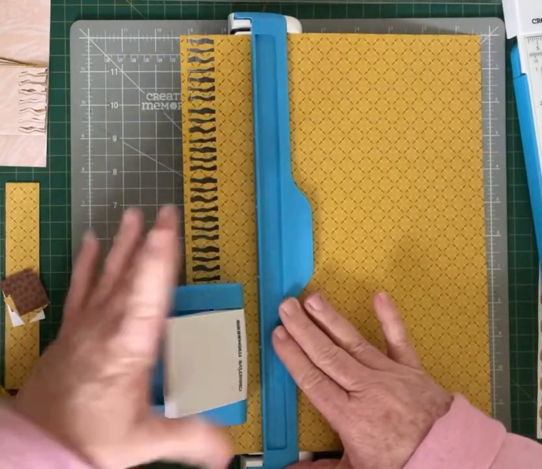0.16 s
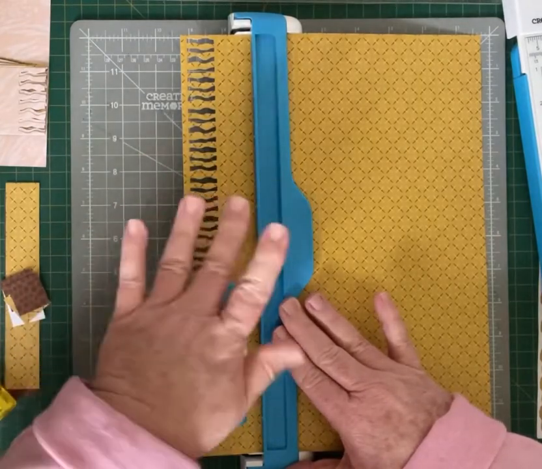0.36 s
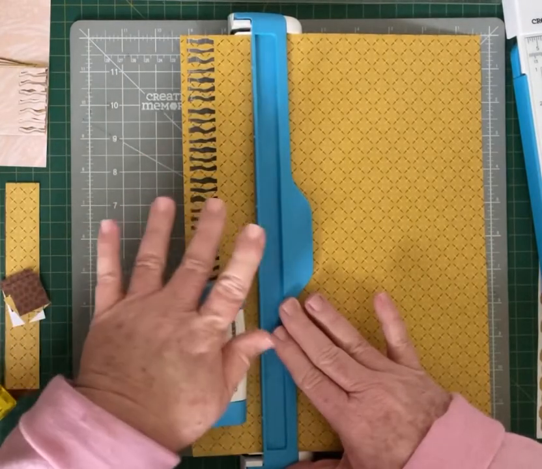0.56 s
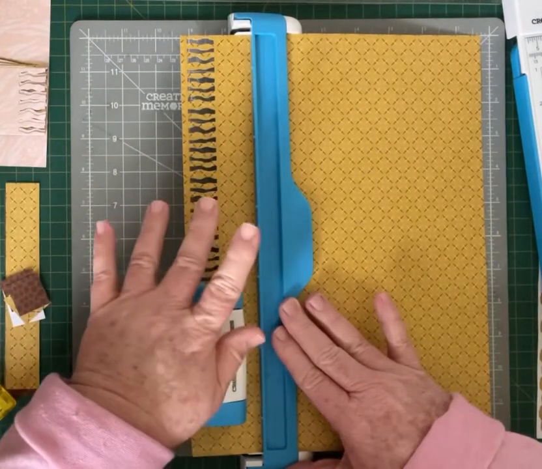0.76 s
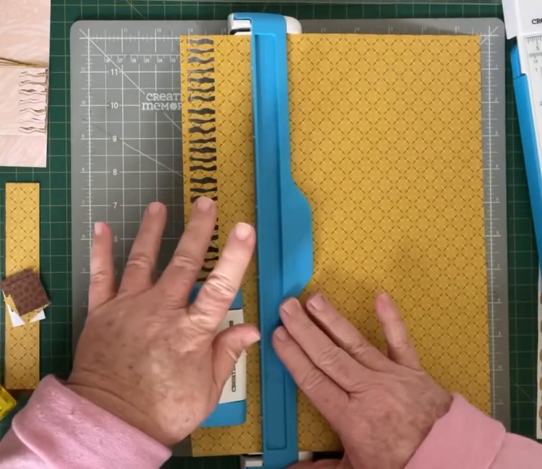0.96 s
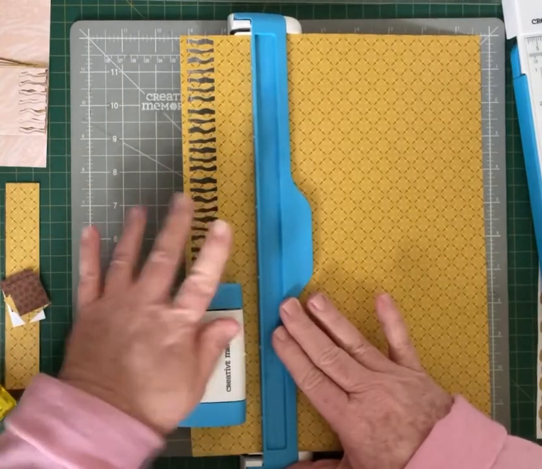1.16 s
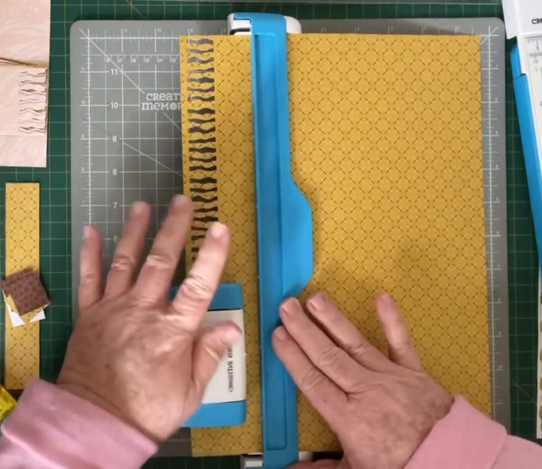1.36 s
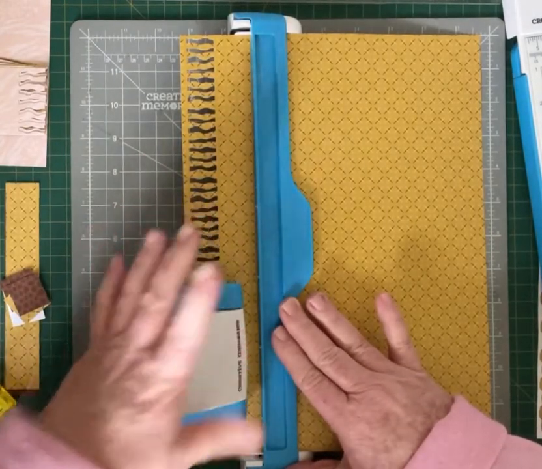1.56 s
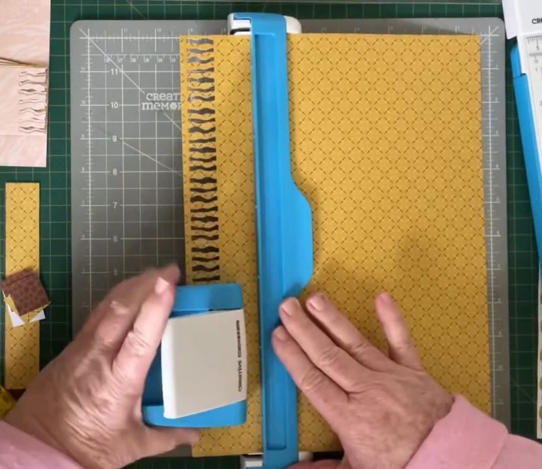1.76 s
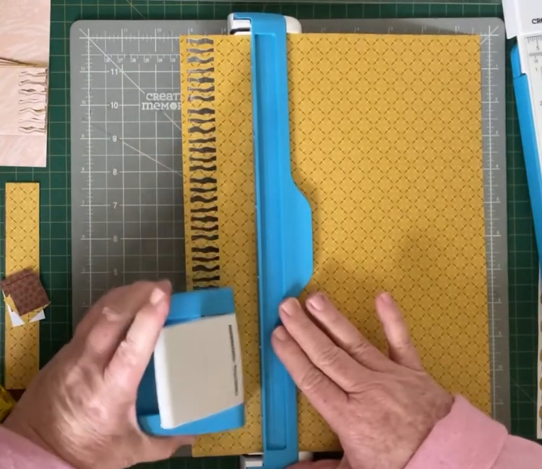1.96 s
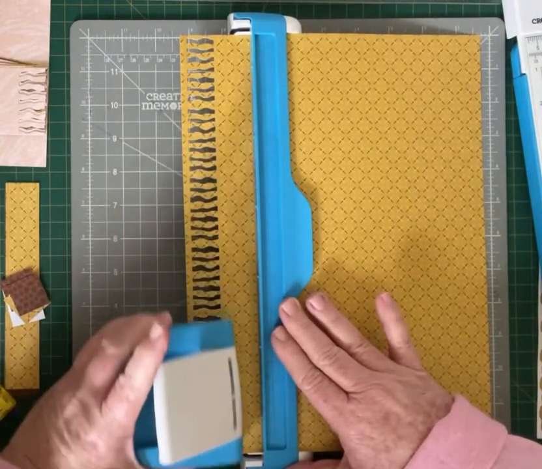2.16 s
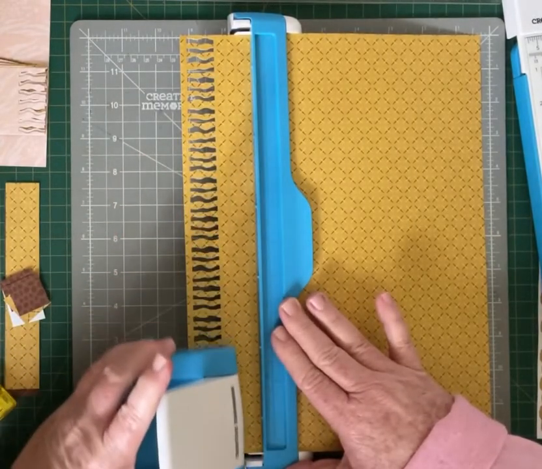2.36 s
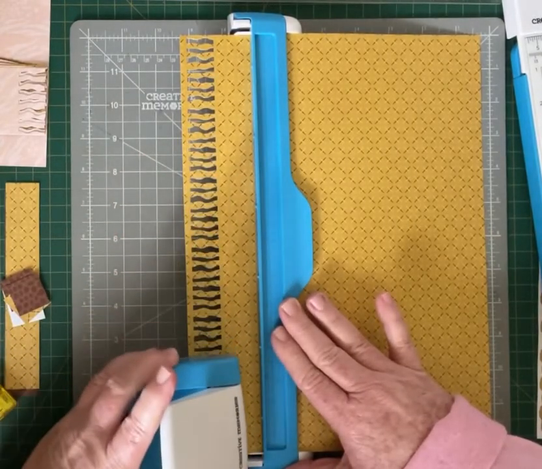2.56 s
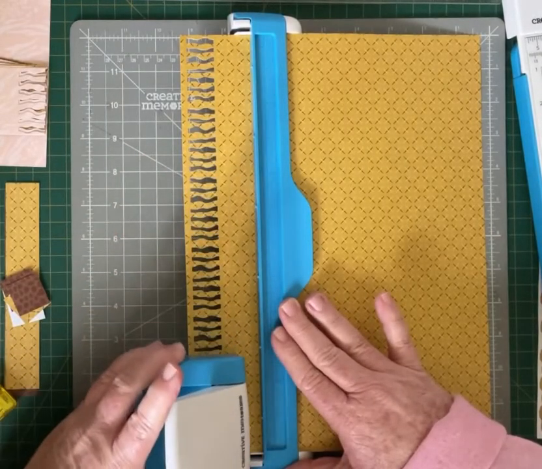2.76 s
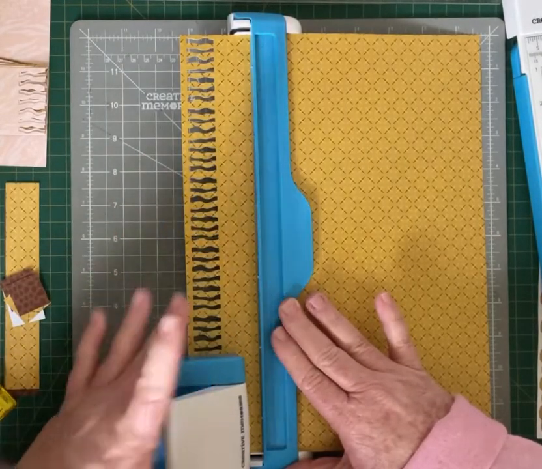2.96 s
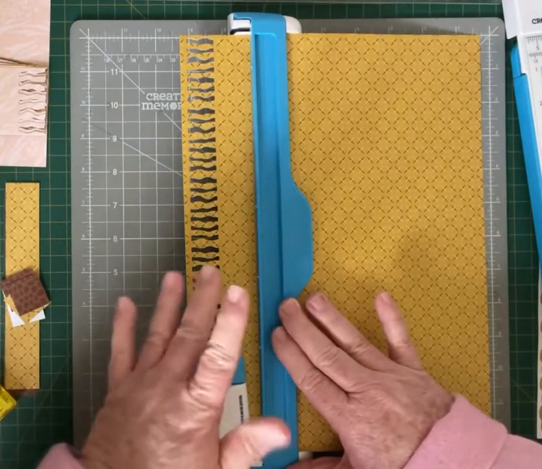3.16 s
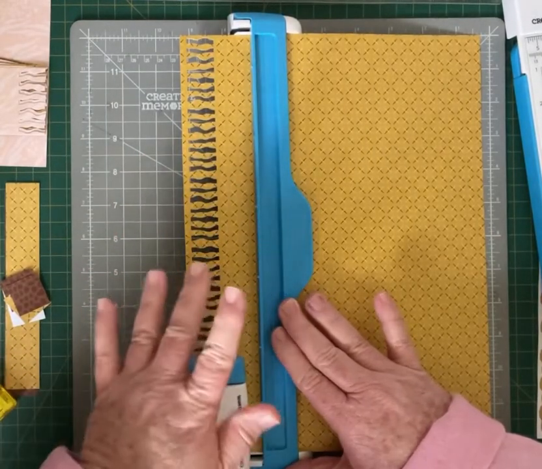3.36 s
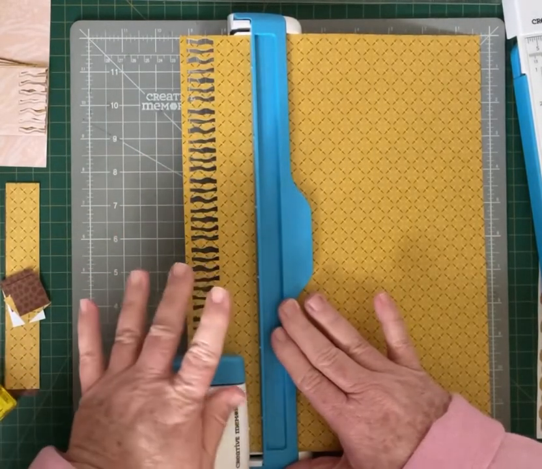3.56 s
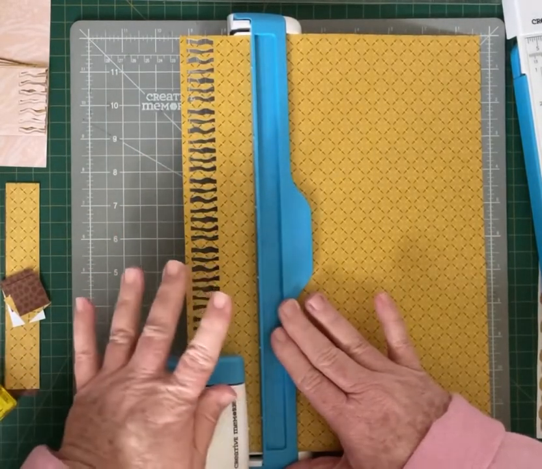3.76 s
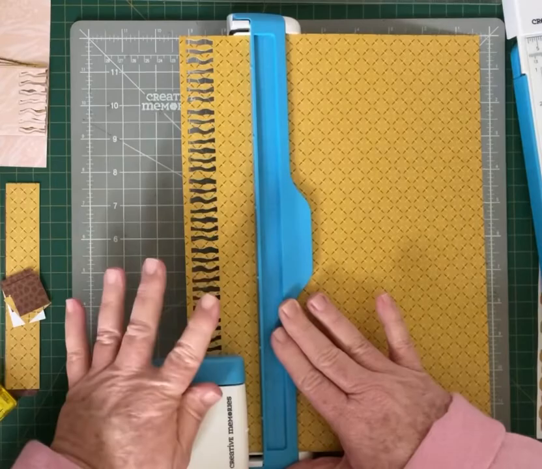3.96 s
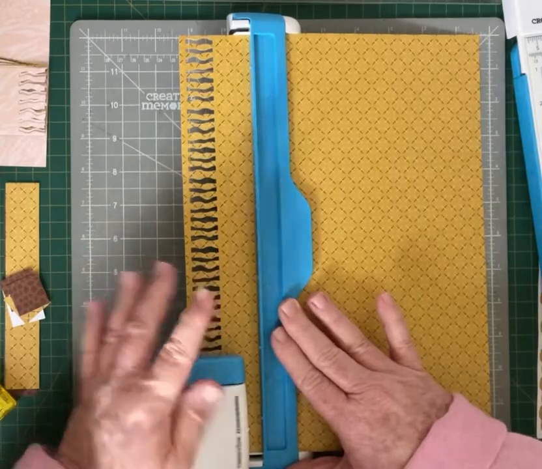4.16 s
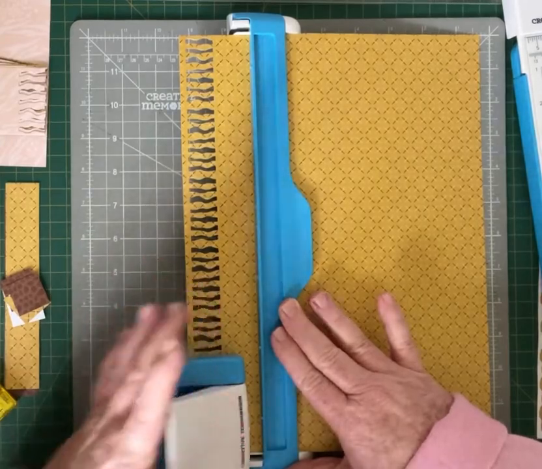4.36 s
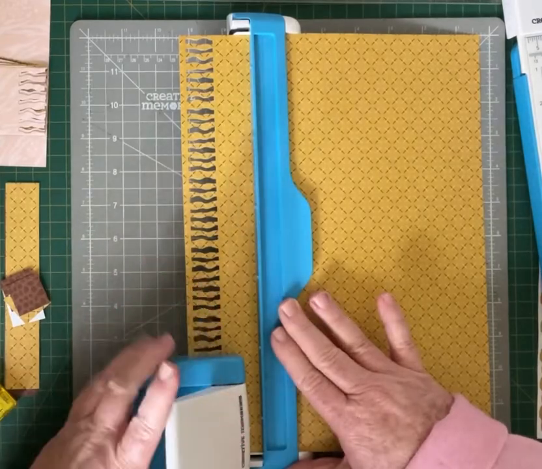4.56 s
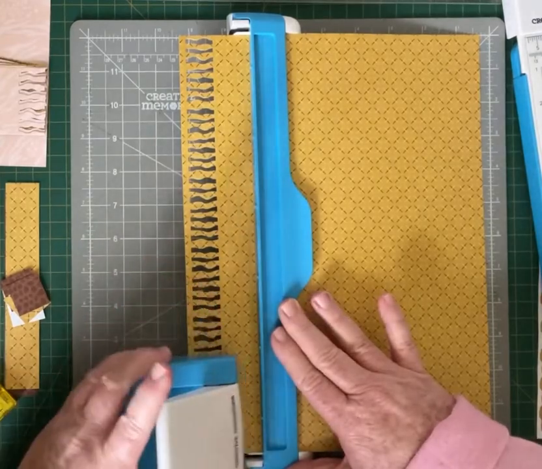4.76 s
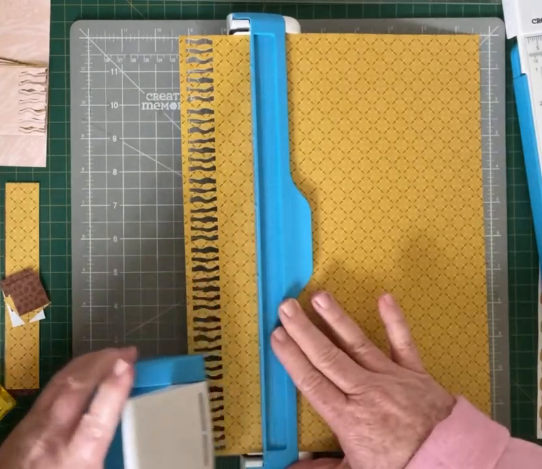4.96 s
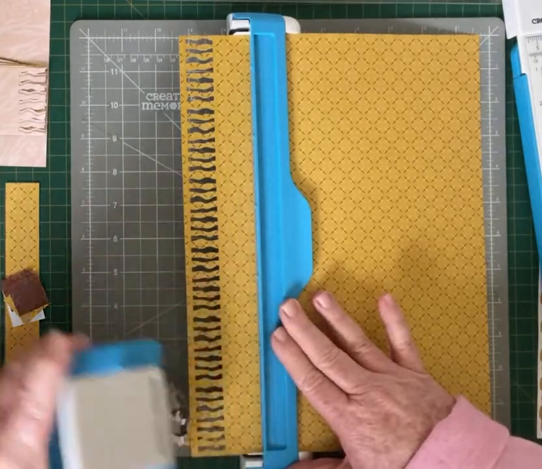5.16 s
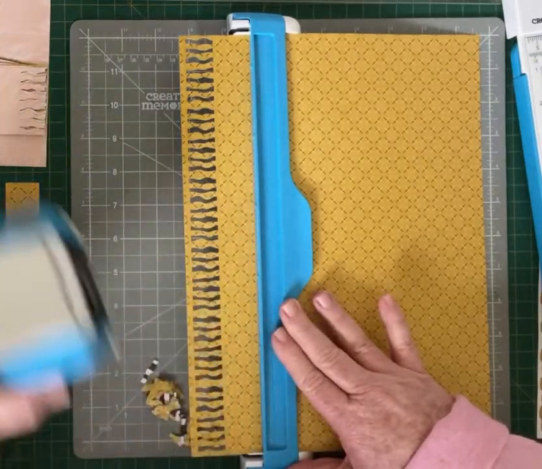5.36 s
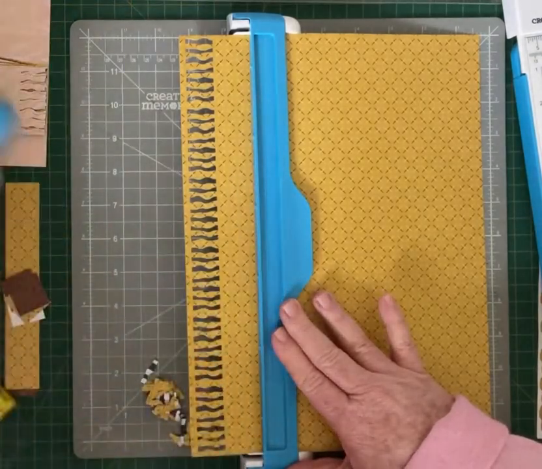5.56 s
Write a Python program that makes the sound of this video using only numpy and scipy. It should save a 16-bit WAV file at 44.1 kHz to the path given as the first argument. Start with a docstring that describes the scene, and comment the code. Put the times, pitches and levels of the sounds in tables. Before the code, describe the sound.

Light plastic clicks and rubs surround two loud snaps of a lever punch cutting paper on a desk, close up.

```python
"""Small plastic knocks over a low room rumble: a palm settles on the lever of a border punch, standing on a
trimmer tray on a desk, close to the microphone in a small furnished room. Stiff paper crunches, the die
snaps through and shakes the desk, and the lever rubs back up. The punch slides briefly along the sheet,
ticks into place and bites again, brighter, its springs ringing. Last, the paper drags out of the slot."""
import sys
import numpy as np
from scipy import signal
from scipy.fft import rfft, irfft, next_fast_len
from scipy.io import wavfile
from scipy.ndimage import uniform_filter1d

SR = 44100
rng = np.random.default_rng(int(sys.argv[2]) if len(sys.argv) > 2 else 0)


def generate_wav(sig):
    """Save sig (samples, or channels by samples) to the path in sys.argv[1] as 16-bit PCM at SR."""
    pcm = np.round(np.clip(np.atleast_2d(sig).T, -1, 1) * 32767).astype(np.int16)
    wavfile.write(sys.argv[1], SR, pcm)


N = 246823
T = np.arange(SR // 3) / SR  # seconds within one blow

# the room's steady rumble: pitch_hz, level_db
RUMBLE_SPECTRUM = [(20, -48), (40, -20), (65, 1), (90, -9), (125, -10.5), (200, -25.5), (400, -27),
                   (800, -31), (2000, -33.5), (4000, -38.5), (8000, -51), (16000, -63)]
# how long the room rings: pitch_hz, t60_s
ROOM_DECAY = [(100, .54), (300, .32), (620, .21), (1200, .23), (2500, .26), (7000, .2), (15000, .17)]
# how strongly the walls answer: pitch_hz, level_db
ROOM_SPECTRUM = [(100, -20.5), (280, -8), (620, -12), (1200, -10), (2500, -12.5), (7500, -10), (10500, -12),
                 (15000, -14)]

# ringing of the desk, the hollow lever, and the steel springs and die: pitch_hz, level_db, t60_s
DESK_MODES = [(78, -1.5, 0.095), (131.4, -1, 0.16), (171, -12.5, .1), (206, -13.5, 0.18), (245, -19, .07),
              (358, -12.5, .08), (430, -16, .06)]
LEVER_MODES = [(633, 1.5, .03), (1652, -12, .03), (2616, -9.5, .03), (2910, -14, 0.037)]
SPRING_MODES = [(1590, -13.5, .15), (1988, -5, .13), (2050, -4, 0.14), (2110, 0.5, 0.16), (2182, -9.5, .13),
                (2312, -8, .13), (2900, -15, .22), (3140, -11.5, .17), (4323, -14.5, .13), (4657, -14, .14),
                (4760, -8.5, .14), (4920, -5.5, .14), (5140, -11.5, .13), (6150, -13.5, .12),
                (7337, -17, .15), (8360, -17.5, .12)]
# resonances of the tray with the punch on it, and of the punch housing: pitch_hz, width_hz, level_db
TRAY_RESONANCES = [(616, 110, 0), (830, 80, -1), (1135, 120, -2.5), (1613, 65, -9.5), (2575, 120, -10),
                   (3570, 240, -15.5), (4530, 110, -20), (5650, 200, -20), (6130, 160, -23.5),
                   (6950, 77, -25.5), (7890, 200, -28)]
HOUSING_RESONANCES = [(651, 91, -1.5), (1310, 350, -7.5), (2030, 89, 1), (2910, 100, -7), (3190, 88, -5),
                      (3840, 130, -10.5), (4460, 250, -7), (4800, 84, -10.5), (5990, 96, -11),
                      (6400, 440, -11), (7180, 100, -11.5), (7870, 170, -11), (9100, 130, -18)]
# a blow's three bands, called body, clack and edge: low_hz, high_hz
BLOW_BANDS = [(200, 1000), (1000, 4000), (4000, 16000)]

# noise of sliding, dragging, rubbing and crunching: pitch_hz, level_db
SLIDE_SPECTRUM = [(100, -12), (300, -3), (470, 4.5), (600, -1.5), (800, 1.5), (1300, -4.5), (1650, 2),
                  (2100, 0.5), (2800, -11), (3900, -2.5), (4700, -9), (6000, -12), (10000, -21),
                  (16000, -24)]
DRAG_SPECTRUM = [(100, -11), (500, -9.5), (1500, -2), (3200, 1), (5000, 1), (8000, 2), (12000, -4.5),
                 (16000, -13)]
RUB_SPECTRUM = [(100, -12), (300, -6.5), (650, 0.5), (1100, -4), (1600, -0.5), (2300, -3), (3100, -1.5),
                (4300, -7), (7000, -8.5), (10000, -14), (16000, -20.5)]
CRUNCH_SPECTRUM = [(100, -13.5), (260, -11), (400, -1.5), (580, 1), (850, -7.5), (1250, -5), (2800, -11.5),
                   (4500, -20), (6500, -20), (8500, -29), (16000, -36)]
# noise of a knock, the tray's boom, the tick, the housing's rattle and the die's crack: pitch_hz, level_db
KNOCK_SPECTRUM = [(100, -15.5), (280, -7), (520, 3), (700, 1.5), (1000, -6), (1550, 0.5), (2200, -3),
                  (2900, -6.5), (4200, -10.5), (6500, -16.5), (10000, -27), (16000, -41.5)]
BOOM_SPECTRUM = [(100, -22), (200, -7), (350, -0.5), (480, -1), (700, -3), (1500, -13), (4000, -32),
                 (10000, -60)]
TICK_SPECTRUM = [(250, -22), (700, -12), (1100, -2), (1500, 7), (2600, 1), (3200, -12), (4300, -3),
                 (5300, -11), (9000, -15), (14000, -18.5), (16000, -23)]
RATTLE_SPECTRUM = [(200, -12), (700, -4), (1200, -3.5), (1900, -1), (3000, -3), (3800, -8), (5000, -1.5),
                   (8200, -7), (9500, -17), (16000, -28)]
CRACK_SPECTRUM = [(100, -5.5), (280, -7.5), (400, -0.5), (700, -2), (1000, -2.5), (1500, -1), (2500, 1.5),
                  (3600, -5), (4700, -3), (5600, -5), (8000, -6.5), (9500, -15.5), (12000, -17),
                  (16000, -22)]

# contour of the sheet dragging out of the slot: time_s, level_db
DRAG_CONTOUR = [(4.7, -84), (4.788, -66), (4.938, -65), (4.978, -49), (4.998, -63), (5.064, -57.5),
                (5.07, -67), (5.13, -87)]
# the palm leaning on the lever: start_s, end_s
PALM_PRESSES = [(.29, 1.43), (3.33, 4.18)]
# the lever rubbing in its guides, down in short pushes and up in one stroke: start_s, end_s, level_db
LEVER_RUBS = [(.436, .468, -50.5), (.497, 0.609, -50.5), (.682, .712, -51.5), (.794, .829, -51.5),
              (1.33, 1.413, -44), (3.386, 3.416, -51.5), (3.482, 3.558, -47), (3.6, 3.646, -48),
              (4.071, 4.167, -44)]
# fingers tapping the lever: start_s, level_db, tilt_db_per_octave
FINGER_TAPS = [(3.382, -40, 6), (4.538, -44.5, -5), (4.5585, -37, 0.5)]
# paper edges flicking off the die and the slot: start_s, level_db
PAPER_FLICKS = [(1.279, -53), (1.286, -46.5), (1.3136, -38.5), (2.4, -53), (4.0541, -45.5), (4.063, -39),
                (4.069, -45.5), (4.978, -57), (5.0599, -56)]
# the punch knocking in its joints and on the tray: start_s, level_db, hardness_db
PUNCH_KNOCKS = [(.439, -45, 0), (.453, -46, -2), (.51, -43, 2), (.5201, -45, 2), (.5367, -41.5, 5),
                (.5663, -51.5, 5.5), (.5962, -43.5, 0.5), (.6709, -44.5, 0), (.696, -44.5, 1),
                (.715, -45, -1), (.8221, -44, -1), (0.8682, -55.5, 3), (.908, -61.5, 5.5), (.966, -56.5, 5),
                (1.235, -41, -3), (1.3765, -38.5, -2), (1.3914, -41, -3.5), (1.419, -43, -3),
                (1.7654, -55, -4.5), (2.187, -41.5, 1), (2.194, -43, 1), (2.4438, -27, -.5),
                (2.569, -42.5, -2), (3.102, -50.5, 2.5), (3.34, -55.5, -3.5), (3.382, -42.5, 1),
                (3.4325, -48, -1), (3.456, -49.5, -1.5), (3.485, -48.5, 2), (3.5109, -40, 3),
                (3.5542, -45, 1), (3.613, -46, 2), (3.6294, -46, 1), (3.719, -55, -2.5), (4.063, -43, -2),
                (4.147, -41, -1.5), (4.3477, -41, -2), (4.5585, -43.5, 0), (4.6355, -38, -2)]
# the punch catching on the cut edge: start_s, body_db, clack_db, edge_db, damping_t60_s
EDGE_CATCH = (2.3025, -40.5, -23.5, -25.5, 0.04)
# the die breaking through:
# start_s, body_db, clack_db, edge_db, spring_db, tearing_s, crunch_lead_s, crunch_db
DIE_SNAPS = [(1.1156, -13.5, -15, -16.5, -42, .004, .0415, -32),
             (3.8045, -22, -10, -16, -26.5, .005, .0365, -30)]

LOADED_THUD_DB, FREE_THUD_DB = -5, -18  # desk thud against a knock, with and without the palm's weight


def amp(db):
    """Decibels to gain."""
    return 10 ** (np.asarray(db) / 20)


def unit_rms(x):
    """Scales to rms 1."""
    return x / np.sqrt(np.mean(x ** 2) + 1e-20)


def unit_crest(x, size=132):
    """Scales so that the loudest stretch of `size` samples has rms 1."""
    return x / np.sqrt(uniform_filter1d(x ** 2, size, mode="constant").max() + 1e-20)


def curve_at(points, hz):
    """Reads a curve on a log-frequency axis."""
    pitch_hz, value = np.transpose(points)
    return np.interp(np.log(hz + 1), np.log(pitch_hz + 1), value)


def add(mix, start_s, sound):
    """Mixes a sound in at start_s."""
    part = mix[round(start_s * SR):][:len(sound)]
    part += sound[:len(part)]


def coloured(x, spectrum, tilt_db=0):
    """Gives x a spectrum, tilted by tilt_db an octave; rms 1."""
    size = next_fast_len(len(x))
    hz = np.fft.rfftfreq(size, 1 / SR)
    gain = amp(curve_at(spectrum, hz) + tilt_db * np.log2(hz + 1))
    return unit_rms(irfft(rfft(x, size) * gain, size)[:len(x)])


def noise(spectrum, count=len(T)):
    """Steady coloured noise, one blow long by default."""
    return coloured(rng.standard_normal(count), spectrum)


def decay(t60):
    """Falls by 60 dB in t60 seconds."""
    return np.exp(-np.log(1000) * T / max(t60, 1e-3))


def ring(modes):
    """Free ringing of modes: pitch_hz, level_db, t60_s."""
    return sum((-1) ** k * amp(db) * decay(t60) * np.sin(2 * np.pi * hz * T)
               for k, (hz, db, t60) in enumerate(modes))


def plastic(resonances, spectrum, burst_t60, burst_db, detune=0.):
    """A blow on plastic: a few damped resonances, and a noise burst for the countless finer ones."""
    shifts = 1 + detune * rng.uniform(-1.5, 1, len(resonances))  # each contact point rings differently
    modes = [(hz * shift, db, np.log(1000) / np.pi / width_hz)
             for (hz, width_hz, db), shift in zip(resonances, shifts)]
    burst = noise(spectrum) * decay(burst_t60)
    return unit_rms(ring(modes)) + amp(burst_db) * unit_rms(burst)


def voiced(blow, levels_db):
    """Sets a blow's body, clack and edge, whose shares tell how hard and sharp the contact is."""
    lead = 512  # silent samples in which the filters settle
    padded = np.pad(blow, (lead, 0))
    filters = [signal.butter(3, band, "bandpass", fs=SR, output="sos") for band in BLOW_BANDS]
    bands = [signal.sosfiltfilt(sos, padded) for sos in filters]
    return sum(amp(db) * unit_crest(band) for db, band in zip(levels_db, bands))[lead:]


def grains(count, per_s, spread_db, hiss):
    """Tiny slips of uneven size over a smooth friction hiss."""
    slipping = rng.random(count) < per_s / SR
    sizes = amp(spread_db * np.minimum(rng.exponential(1, count), 4))
    signs = np.sign(rng.standard_normal((2, count))[0])
    return unit_rms(slipping * sizes * signs) + hiss * rng.standard_normal(count)


def room_tone():
    """The low rumble of a quiet room, far behind the desk."""
    return amp(-58) * noise(RUMBLE_SPECTRUM, N)


def room_reflections(direct):
    """The walls of a small furnished room: sparse echoes, each band dying at its own speed."""
    count = SR // 2
    echoes = rng.choice([-1., 1.], count) * (rng.random(count) < 4000 / SR)
    echoes *= np.clip((np.arange(count) / SR - .004) / .006, 0, 1)  # they reach the microphone later
    hz, t, spectra = signal.stft(echoes, SR, nperseg=256)
    t60 = curve_at(ROOM_DECAY, hz)[:, None]
    fade = np.exp(-np.log(1000) * t / t60) * np.sqrt(2 * np.log(1000) / t60)
    gain = amp(curve_at(ROOM_SPECTRUM, hz))[:, None]
    tail = signal.istft(spectra * fade * gain, SR, nperseg=256)[1] / np.sqrt(np.mean(echoes ** 2) * SR)
    return signal.fftconvolve(direct, tail)[:N]


def desk_thud(db, rise_s):
    """The heavy desk swings up over a few milliseconds and hums."""
    swing = 1 - np.exp(-(T / rise_s) ** 2)
    return amp(db) * unit_crest(ring(DESK_MODES) * swing, size=530)


def paper_chafe(rise_db_per_s=300, fade_db_per_s=170):
    """The paper chafes faintly around the middle of each lever stroke."""
    strokes_db = []
    for start_s, end_s, db in LEVER_RUBS:
        t = np.arange(N) / SR - (start_s + end_s) / 2
        strokes_db.append(db - np.maximum(-rise_db_per_s * t, fade_db_per_s * t))
    grit = coloured(grains(N, per_s=2500, spread_db=4, hiss=1.2), RUB_SPECTRUM)
    return amp(np.max(strokes_db, axis=0) - 10) * grit


def punch_slide(start_s=1.88, rise_s=.16, hold_s=.3, fade_db_per_s=30):
    """The punch slides briefly along the sheet; its gritty hiss swells, holds, then fades away slowly."""
    t = np.arange(N) / SR - start_s
    swell = np.clip(t / rise_s, 1e-6, 1)
    fading_s = np.maximum(t - rise_s - hold_s, 0)
    grit = coloured(grains(N, per_s=3500, spread_db=2, hiss=1.2), SLIDE_SPECTRUM)
    return swell * amp(-55 - fade_db_per_s * fading_s) * grit


def sheet_drag():
    """The sheet drags out of the slot with a bright hiss."""
    contour_db = np.interp(np.arange(N) / SR, *np.transpose(DRAG_CONTOUR), left=-140, right=-140)
    grit = coloured(grains(N, per_s=5700, spread_db=2, hiss=1.4), DRAG_SPECTRUM)
    return amp(contour_db + 2.5) * grit


def lever_note(db, tilt_db, detune=.03, ring_share=1):
    """The hollow lever's short, round note, a little different at each point of contact."""
    shifts = 1 + detune * rng.uniform(-1.2, 1, len(LEVER_MODES))
    modes = [(hz * shift, mode_db + tilt_db * np.log2(hz), t60 * ring_share)
             for (hz, mode_db, t60), shift in zip(LEVER_MODES, shifts)]
    return amp(db) * unit_crest(ring(modes) * (1 - np.exp(-T / .0018)))


def lever_slips(per_s=40, level_db=-59, spread_db=3):
    """The lever gives in faint, uneven steps while the palm leans on it and damps its ring."""
    out = np.zeros(N)
    for start_s, end_s in PALM_PRESSES:
        steps = np.arange(start_s, end_s, 1 / per_s)
        for step_s, (late, size) in zip(steps, rng.random((len(steps), 2))):
            db = level_db + spread_db * (2 * size - 1)
            add(out, step_s + late / per_s, lever_note(db, tilt_db=2.5, detune=.16, ring_share=.45))
    return out


def lever_rubs(return_s=.5):
    """The lever rubs grittily in its guides going down and, brighter, coming back after a snap."""
    out = np.zeros(N)
    for start_s, end_s, db in LEVER_RUBS:
        count = round((end_s - start_s) * SR)
        rising = any(0 < start_s - snap_s < return_s for snap_s, *_ in DIE_SNAPS)
        slips = grains(count, per_s=2000, spread_db=3, hiss=.6)
        grit = coloured(slips, RUB_SPECTRUM, tilt_db=.9 if rising else -1)
        add(out, start_s, amp(db) * grit * signal.windows.tukey(count, .5))
    return out


def finger_taps():
    """A fingertip meets the lever and sets it ringing."""
    out = np.zeros(N)
    for start_s, db, tilt_db in FINGER_TAPS:
        add(out, start_s, lever_note(db, tilt_db))
    return out


def paper_flicks():
    """A cut paper edge springs free: a thin, bright click over a faint desk thud."""
    out = np.zeros(N)
    contact = 1 - np.exp(-T / .0013)
    for start_s, db in PAPER_FLICKS:
        blow = plastic(TRAY_RESONANCES, KNOCK_SPECTRUM, burst_t60=.034, burst_db=4, detune=.058)
        click = voiced(blow * contact, (db - 9, db - 2, db))
        add(out, start_s, click + desk_thud(db - 13, rise_s=.005))
    return out


def knock(db, hardness_db, thud_db):
    """Plastic on plastic, brighter the harder the contact; the tray booms and the desk thuds just after."""
    contact = 1 - np.exp(-T / .0019)  # the parts take a moment to seat
    blow = plastic(TRAY_RESONANCES, KNOCK_SPECTRUM, burst_t60=.04, burst_db=-1.5, detune=.066)
    clack = voiced(blow * contact, (db - hardness_db, db + hardness_db, db - 13 + hardness_db))
    tray_flex = noise(BOOM_SPECTRUM) * decay(t60=.11) * (1 - np.exp(-(T / .009) ** 2))
    boom = amp(db - 11) * unit_crest(tray_flex, size=400)
    return clack + boom + desk_thud(db + thud_db, rise_s=.0049)


def punch_knocks():
    """Loose parts meet and rock the punch on the tray; the palm's weight passes the blow to the desk."""
    out = np.zeros(N)
    for start_s, db, hardness_db in PUNCH_KNOCKS:
        loaded = any(press_s < start_s < release_s for press_s, release_s in PALM_PRESSES)
        add(out, start_s, knock(db, hardness_db, LOADED_THUD_DB if loaded else FREE_THUD_DB))
    return out


def edge_catch():
    """The punch flicks into place against the cut edge: one dry, bright tick."""
    start_s, *levels_db, damping_t60 = EDGE_CATCH
    out = np.zeros(N)
    tick = plastic(HOUSING_RESONANCES, TICK_SPECTRUM, burst_t60=.054, burst_db=17)
    add(out, start_s, voiced(tick * (decay(damping_t60) + .06), levels_db))
    return out


def paper_crunches(cracks=3, creep_s=.012, swell_db=5, stall_s=.008):
    """Fibres fail thick and fast under the die's growing load, with a few larger cracks among them."""
    out = np.zeros(N)
    for snap_s, *_, lead_s, db in DIE_SNAPS:
        start_s, length_s = snap_s - lead_s, lead_s - stall_s  # stalls just before the snap
        t = np.arange(-creep_s, length_s, 1 / SR)
        level_db = db + np.interp(t, [-creep_s, 0, .003, length_s], [-28, -14, 0, swell_db])
        breaks = grains(len(t), per_s=2300, spread_db=3, hiss=.71)
        fibres = coloured(breaks, CRUNCH_SPECTRUM, tilt_db=.84)
        add(out, start_s + t[0], fibres * amp(level_db) * signal.windows.tukey(len(t), .12))
        for load in np.arange(cracks) / cracks:
            crack = knock(db - 2 + swell_db * load, hardness_db=-1.5, thud_db=-7)
            add(out, start_s + load * length_s, crack)
        add(out, snap_s - .016, lever_note(db + 4.5, tilt_db=-4))  # the lever jolts at the crunch's height
    return out


def die_snaps():
    """The teeth tear through, the housing rattles, the springs ring and the desk takes the blow."""
    out = np.zeros(N)
    for start_s, body_db, clack_db, edge_db, spring_db, tearing_s, *_ in DIE_SNAPS:
        tearing = noise(CRACK_SPECTRUM) * np.exp(-np.maximum(T - tearing_s, 0) / .0015)
        housing = plastic(HOUSING_RESONANCES, CRACK_SPECTRUM, burst_t60=.065, burst_db=-6.5)
        crack = voiced(unit_rms(housing) + amp(1) * unit_rms(tearing), (body_db, clack_db, edge_db))
        rattle = amp(edge_db - 12.5) * noise(RATTLE_SPECTRUM) * decay(t60=.175)
        springs = amp(spring_db) * unit_crest(ring(SPRING_MODES))
        end_stop = knock(clack_db - 23.5, hardness_db=4.5, thud_db=FREE_THUD_DB)
        add(out, start_s, crack + rattle + springs)
        add(out, start_s + .003, desk_thud(-20, rise_s=.0073))
        add(out, start_s + .02, end_stop)  # the die hits its stop
    return out


def scene():
    """One microphone close to the punch, with the room's reflections and rumble behind."""
    handling = punch_knocks() + finger_taps() + lever_slips() + paper_flicks()
    punching = die_snaps() + edge_catch() + paper_crunches()
    friction = lever_rubs() + paper_chafe() + punch_slide() + sheet_drag()
    direct = handling + punching + friction
    return (room_tone() + direct + amp(1.5) * room_reflections(direct))[None]


def record(dry):
    """The small microphone loses the deepest bass and rounds the loudest peaks; the top treble is cut."""
    low_cut_hz, high_cut_hz, ceiling = 42, 16250, 1.3
    lean = signal.sosfilt(signal.butter(3, low_cut_hz, "highpass", fs=SR, output="sos"), dry)
    rounded = ceiling * np.tanh(lean / ceiling)
    lowpass = signal.firwin(301, high_cut_hz, window=("kaiser", 8), fs=SR)
    return signal.oaconvolve(rounded, lowpass[None], "same")


dry = scene()
out = record(dry)
generate_wav(out)
```